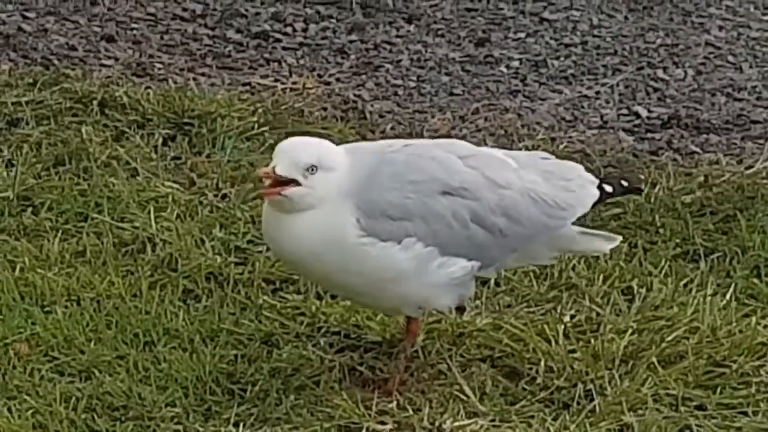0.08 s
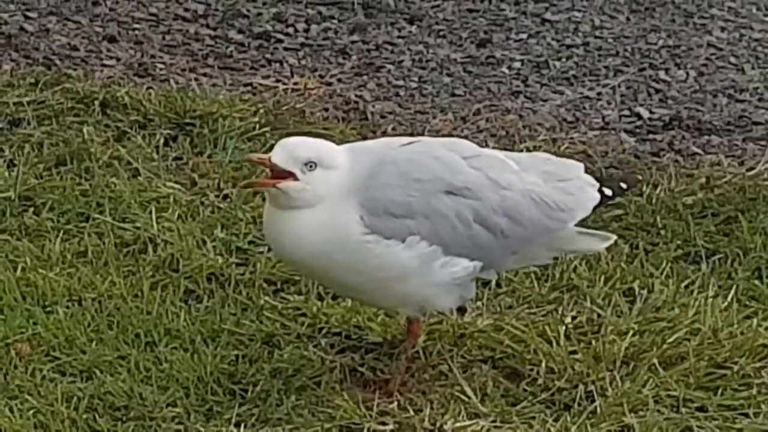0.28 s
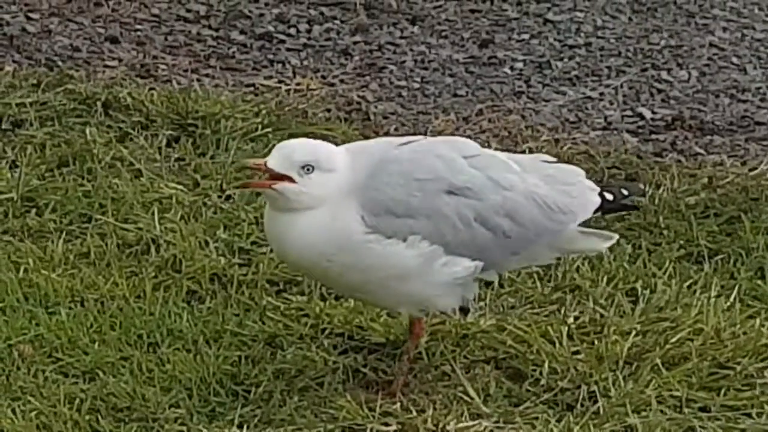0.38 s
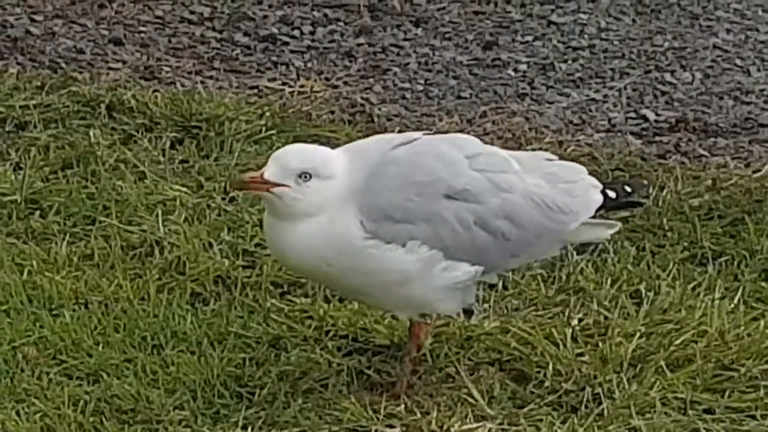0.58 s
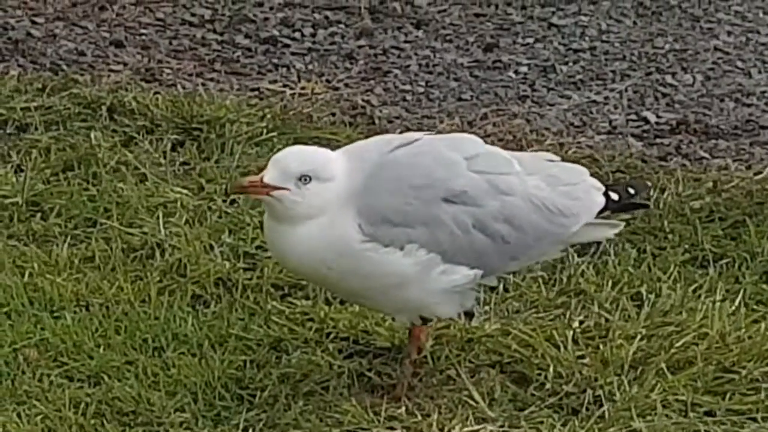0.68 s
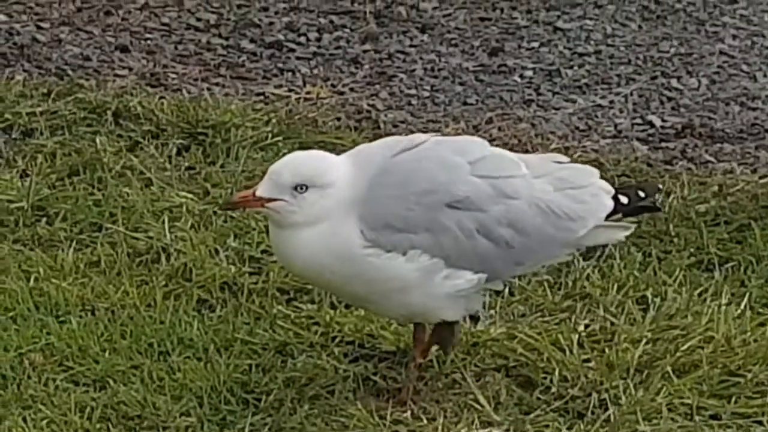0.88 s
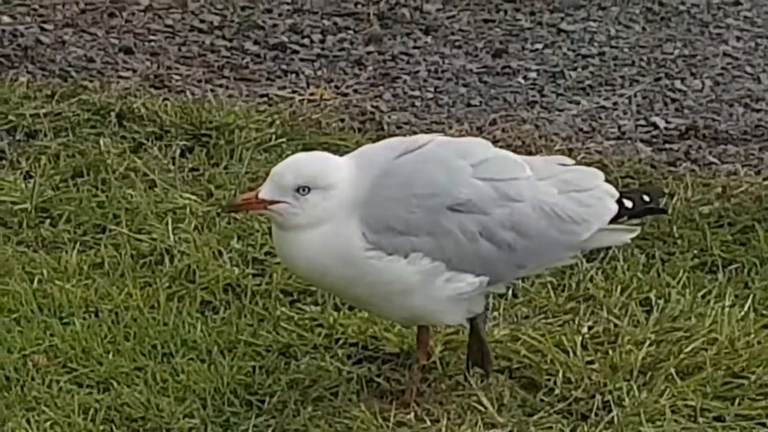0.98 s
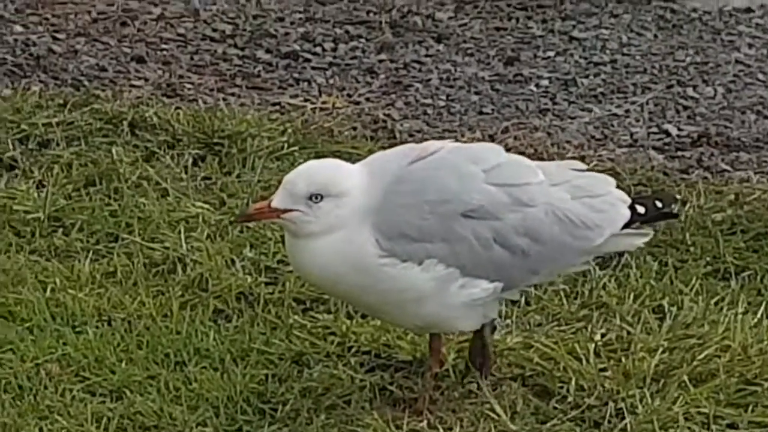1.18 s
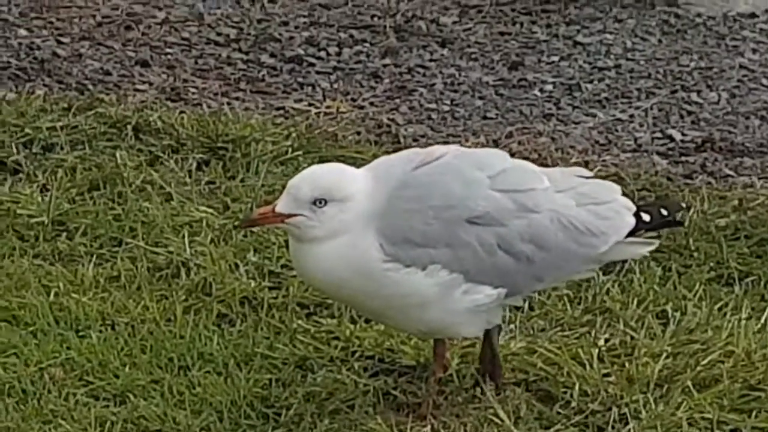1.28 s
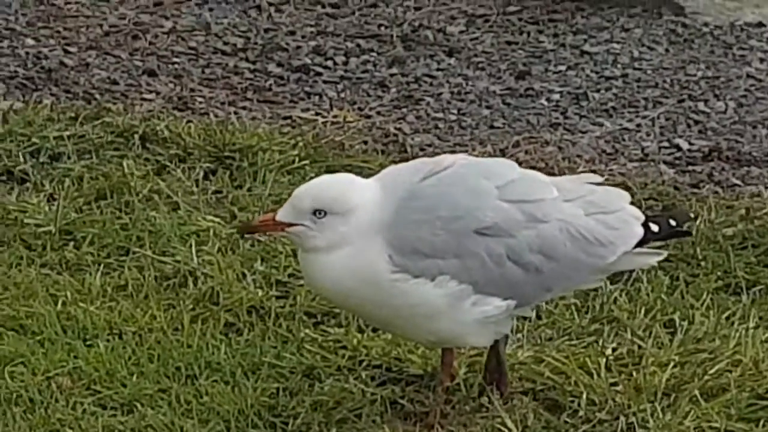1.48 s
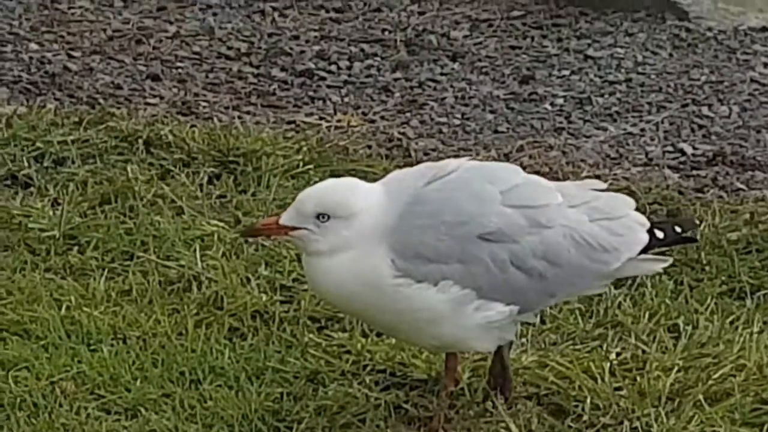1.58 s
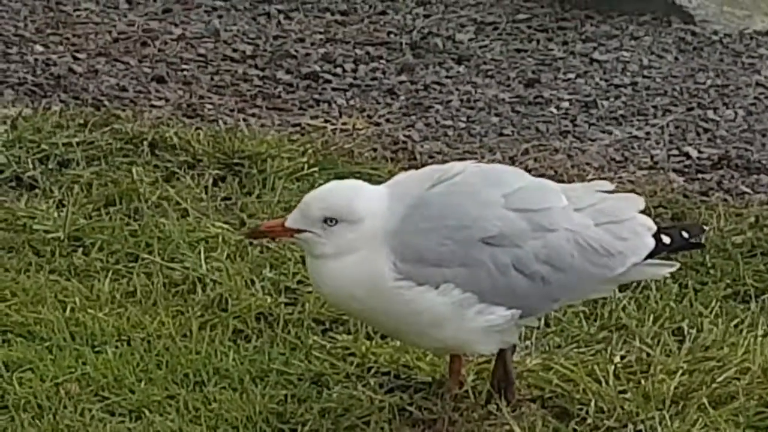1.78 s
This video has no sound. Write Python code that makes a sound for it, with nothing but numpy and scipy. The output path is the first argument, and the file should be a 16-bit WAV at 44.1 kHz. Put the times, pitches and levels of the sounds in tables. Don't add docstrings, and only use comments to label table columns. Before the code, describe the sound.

A gull close to the microphone gives one short raspy cry that jumps loud, then slides down into a clear whistle; afterwards only soft distant water, low hum, light wind and a tiny far bird chirp remain.

```python
import sys
import numpy as np
from scipy import signal
from scipy.fft import rfft, irfft
from scipy.io import wavfile
from scipy.ndimage import uniform_filter1d

SR = 44100
rng = np.random.default_rng(int(sys.argv[2]) if len(sys.argv) > 2 else 0)


def output_pcm(signal):
    pcm = np.clip(np.atleast_2d(signal).T, -1, 1) * 32767
    wavfile.write(sys.argv[1], SR, np.round(pcm).astype(np.int16))


def convert_level_to_amplitude(level_db):
    exponent = np.asarray(level_db, float) / 20
    return 10 ** exponent


N = 79380

# (time [s], pitch [Hz], level [dB], brightness [dB/octave], roughness [0-1.3])
LEAD_IN = [
    (.188, 870, -56, -9, 1.3),
    (.194, 920, -44, -9, 1.3),
    (.212, 1010, -39, -8, 1.2),
    (.226, 1075, -39, -6, 1.2),
    (.235, 1110, -40, -5, 1.0),
    (.24, 1110, -56, -5, 1.0),
]
HIGH_BREAK = [
    (.233, 860, -56, .1, .5),
    (.237, 870, -41, .1, .5),
    (.25, 870, -42, .1, .6),
    (.262, 865, -36, .1, .6),
    (.27, 860, -48, .1, .8),
]
ROUGH_RISE = [
    (.261, 1100, -54, 1, .3),
    (.27, 1112, -27, 2, .4),
    (.29, 1147, -28, 2.5, .55),
    (.32, 1180, -29, 2.5, .55),
    (.345, 1175, -31, 2, .55),
    (.375, 1230, -35, 1, .6),
    (.392, 1285, -39, 0.1, .95),
    (.41, 1200, -36.5, 0.1, .7),
]
CLEARING_FALL = [
    (0.438, 1172, -33, 1, 0.53),
    (.5, 1153, -34.5, -1.3, 0.34),
    (0.527, 1133, -33.5, 0, 0.25),
    (0.598, 1103, -35.5, -2.5, 0.26),
    (0.634, 1043, -36.5, -9, 0.14),
    (0.691, 975, -38, -12.5, .1),
    (0.723, 937, -42, -9.5, 0.02),
    (.737, 925, -64, -36, .08),
]
# (frequency [Hz], gain [dB])
THROAT = [(1000, -11.5), (2300, 1.84), (3400, -0.5), (4700, -7.5), (7000, -14), (7900, -18), (10000, -21),
          (14000, -14.5)]
# (frequency [Hz], right port lag [rad], left minus right [dB])
CRY_PORTS = [(980, 0.28, -3.5), (2480, 0.94, 3.5), (3340, .7, -4), (4750, 0.14, -5.5), (7300, 0.35, -15.5),
             (14000, 2.5, 1.5)]
# (centre [Hz], width [Hz], depth [dB])
SPECTRAL_DIPS = [(5400, 200, -24), (5850, 300, -12), (6350, 300, -32), (8550, 150, -10),
                 (10350, 300, -16), (12250, 350, -16)]
# (frequency [Hz], density [dB/Hz])
WATER_SPECTRUM = [(60, -35.5), (170, -7), (450, -13), (900, -14), (2200, -18.5), (2700, -28.5),
                  (3500, -30.5), (4500, -51), (15000, -75)]
# (frequency [Hz], likeness [0-1])
WATER_LIKENESS = [(150, 0.34), (500, 0.63), (1500, 0.72), (2300, 1), (3200, 0.17), (4200, 0.075)]
# (frequency [Hz], left minus right [dB])
WATER_LEAN = [(60, 29), (180, 2), (530, 0), (1590, -4.5), (4730, -3.5), (14100, 3.5)]
# (frequency [Hz], right port lag [rad])
LEFT_SOURCE_LAG = [(0, -0.5), (650, 0.81), (1210, 2.5), (1500, 4.5), (2330, 4.5), (2900, 10.5), (3600, 9.5)]
# (frequency [Hz], rms level [dB])
MACHINE_TONES = [(75.4, -61.5), (150.7, -57), (419.9, -64), (473.7, -64), (554.5, -66.5), (899.0, -64),
                 (1082, -70)]
# (frequency [Hz], density [dB/Hz])
WIND_SPECTRUM = [(20, -17.5), (60, -2.5), (110, 0.3), (200, -10.5), (350, -12.5), (600, -61)]
# (time [s], left port level [dB], right minus left [dB])
GUSTS = [(0.0, -48, -5.5), (0.26, -45.5, -3.5), (0.28, -37.5, -7.5), (0.354, -51.5, -9), (0.6, -46, 2.5),
         (0.616, -36, -11.5), (0.842, -45, -0.5), (0.946, -75, 2), (0.986, -49.5, -7), (1.222, -43.5, -1),
         (1.258, -59, -9), (1.328, -45.5, -5), (1.358, -48, -2.5), (1.8, -58.5, 5)]
# (time [s], pitch [Hz], level [dB])
BIRD_CHIRP = [
    (.872, 5500, -84),
    (.892, 4600, -70),
    (.903, 4300, -82),
    (.914, 3900, -66),
    (.93, 3400, -86),
]
# (time [s], pitch [Hz], level [dB])
BIRD_TICK = [
    (1.152, 6250, -92),
    (1.16, 6200, -73),
    (1.168, 6150, -92),
]
# (frequency [Hz], density [dB/Hz])
HISS_SPECTRUM = [(2500, -1), (4000, 5.5), (8000, -1), (11000, -5), (13000, 1.5), (14600, -4.5)]

FLUTTER_HZ, WOBBLE_HZ, RASP_HZ = 140, 220, 420
FLUTTER, WOBBLE_RAD, RASP = .7, .33, .4
SECOND_HZ, SECOND_DEPTH = 250, 0.07
BREATH_DB = -20
SPREAD_RAD = .12
FULL_DB = -35.5
TOP_HZ, TOP_SHARE = 8100, 7
FIFTH_SHARE = 2.4
BEAK_HZ, BEAK_OCTAVES = 6300, 1


def evened(x):
    return x / np.sqrt(np.mean(abs(x) ** 2) + 1e-20)


def read(points, hz, axis=1):
    p = np.transpose(points)
    return np.interp(np.log(hz + 1), np.log(p[0] + 1), p[axis])


def slow(width_hz):
    hz = np.fft.rfftfreq(N, 1 / SR)
    spectrum = rfft(rng.standard_normal(N)) / (1 + (hz / width_hz) ** 2)
    return evened(irfft(spectrum, N))


def coloured(x, db):
    return irfft(rfft(x) * convert_level_to_amplitude(db), N)


def partial_gain(k, hz, level_db, tilt_db, low_hz):
    partial_hz = k * hz
    below_beak = partial_hz < BEAK_HZ
    octaves = np.where(below_beak, np.log2(k / 2), BEAK_OCTAVES)
    share = TOP_SHARE * np.clip(np.log2(partial_hz / TOP_HZ), 0, .4)
    share = share + FIFTH_SHARE * (k > 4) * below_beak
    dull_db = share * np.clip(level_db - FULL_DB, -20, 0)
    throat_hz = partial_hz * np.where(k < 6 and not low_hz, 1150 / hz, 1)
    gain_db = read(THROAT, throat_hz) + np.minimum(tilt_db * octaves, 4) + dull_db
    return convert_level_to_amplitude(gain_db) * (partial_hz < 15000) * (partial_hz > low_hz)


def cry(rows, low_hz=0):
    t = np.arange(N) / SR
    s, *columns = np.transpose(rows)
    hz, level_db, tilt_db, rough = (np.interp(t, s, column) for column in columns)
    rough = np.clip(rough, 0, 3)

    phase = 2 * np.pi * np.cumsum(hz) / SR + WOBBLE_RAD * rough * slow(WOBBLE_HZ)
    beat = SECOND_DEPTH * np.cos(2 * np.pi * SECOND_HZ * t + 1.8 * slow(29.1))
    flutter = FLUTTER * np.minimum(rough, .8) * np.clip(slow(FLUTTER_HZ), -3, .4)
    swing = np.exp(flutter) * (1 + beat)

    partials, power = np.zeros((2, N)), 0
    for k in range(1, 15):
        gain = partial_gain(k, hz, level_db, tilt_db, low_hz)
        depth = RASP * rough * (k / 2) ** 1.4
        rasp = depth * (slow(RASP_HZ) + 1j * slow(RASP_HZ))
        rasped = (1 + rasp) / np.sqrt(1 + 2 * depth ** 2)
        z = -gain * rasped * np.exp(1j * (k * phase + SPREAD_RAD * k ** 2))
        lean = convert_level_to_amplitude(read(CRY_PORTS, k * hz, axis=2) / 2)
        lag = np.exp(-1j * read(CRY_PORTS, k * hz))
        partials += np.array([z * lean, z / lean * lag]).real
        power = power + gain ** 2 / 2

    f = np.fft.rfftfreq(N, 1 / SR)
    breath_spectrum = rfft(rng.standard_normal(N)) * convert_level_to_amplitude(read(THROAT, f)) * (f > 500)
    breath = convert_level_to_amplitude(BREATH_DB) * rough * evened(irfft(breath_spectrum, N))
    voiced = swing * (partials / np.sqrt(power) + breath)
    return voiced * convert_level_to_amplitude(level_db) * (t > s[0]) * (t < s[-1])


def grass(x):
    level_db, t60 = -17, .07
    t = np.arange(4000) / SR
    taps = rng.standard_normal((2, len(t))) * (rng.random((2, len(t))) < .05)
    taps = taps * convert_level_to_amplitude(-60 * t / t60)
    return convert_level_to_amplitude(level_db) * signal.fftconvolve(x, taps / np.linalg.norm(taps[0]), axes=1)[:, :N]


def chirp(rows):
    t = np.arange(N) / SR
    s, hz, db = np.transpose(rows)
    phase = 2 * np.pi * np.cumsum(np.interp(t, s, hz)) / SR
    tone = np.sin(phase + 0.66 * slow(200))
    return tone * convert_level_to_amplitude(np.interp(t, s, db, -150, -150)) * np.array([[1], [-1]])


def wash():
    level_db, patch_db = -50.5, 0.8
    frames, hz = N // 256 + 5, np.fft.rfftfreq(1024, 1 / SR)
    a, b, c, d, patches = rng.standard_normal((frames, 513, 5)).T
    patches = uniform_filter1d(patches, size=10, axis=0)
    patches = evened(uniform_filter1d(patches, size=10, axis=1))

    left, unrelated = a + 1j * b, c + 1j * d
    same = np.clip(read(WATER_LIKENESS, hz), -1, 1)[:, None]
    lag = np.exp(-1j * np.interp(hz, *np.transpose(LEFT_SOURCE_LAG)))[:, None]
    right = lag * same * left + np.sqrt(1 - same ** 2) * unrelated

    lean_db = read(WATER_LEAN, hz)[:, None] / 2
    z = np.array([left, right]) * convert_level_to_amplitude([lean_db, -lean_db])
    z *= convert_level_to_amplitude(read(WATER_SPECTRUM, hz)[:, None] + patch_db * patches) * (hz > 30)[:, None]
    return convert_level_to_amplitude(level_db) * evened(signal.istft(z, nperseg=1024, noverlap=768)[1][:, :N])


def hum():
    width_hz, whine_hz, whine_db = 18, 11800, -99
    t = np.arange(N) / SR
    out = convert_level_to_amplitude(whine_db) * np.sin(2 * np.pi * whine_hz * t) * np.array([[1], [-1]])
    for hz, db in MACHINE_TONES:
        waver = 1 + .5 * (slow(width_hz) + 1j * slow(width_hz))
        z = waver * np.exp(2j * np.pi * (hz * t + rng.random()))
        lag = np.exp(-1j * np.interp(hz, *np.transpose(LEFT_SOURCE_LAG)))
        out = out + convert_level_to_amplitude(db) * np.array([z, z * lag]).real
    return out


def wind():
    lump_db, surge_db = 3.0, 1.6
    t = np.arange(N) / SR
    s, left_db, right_db = np.transpose(GUSTS)
    colour_db = read(WIND_SPECTRUM, np.fft.rfftfreq(N, 1 / SR))
    surge = surge_db * slow(13.4)
    ports = []
    for _ in range(2):
        lumpy = rng.standard_normal(N) * convert_level_to_amplitude(lump_db * slow(22) + surge)
        ports.append(evened(coloured(lumpy, colour_db)))
    return np.array(ports) * convert_level_to_amplitude([np.interp(t, s, left_db), np.interp(t, s, left_db + right_db)])


def hiss():
    level_db = -72
    hz = np.fft.rfftfreq(N, 1 / SR)
    colour_db = read(HISS_SPECTRUM, hz) - 60 * (hz < 1500)
    return convert_level_to_amplitude(level_db) * evened(coloured(rng.standard_normal((2, N)), colour_db))


def scene():
    hz = np.fft.rfftfreq(N, 1 / SR)
    gull = cry(LEAD_IN) + cry(HIGH_BREAK, low_hz=2200) + cry(ROUGH_RISE + CLEARING_FALL)
    dips_db = sum(db * np.exp(-((hz - dip_hz) / width) ** 2) for dip_hz, width, db in SPECTRAL_DIPS)
    near = coloured(gull + grass(gull), dips_db)
    far_bird = chirp(BIRD_CHIRP) + chirp(BIRD_TICK)
    return near + far_bird + wash() + hum() + wind() + hiss()


def top_cut(x):
    return signal.sosfilt(signal.butter(12, 14690, fs=SR, output="sos"), x)


def record(dry):
    limited = coloured(dry, -90 * (np.fft.rfftfreq(N, 1 / SR) > 14720))
    return top_cut(limited - .0006)


dry = scene()
out = record(dry)
output_pcm(out)
```